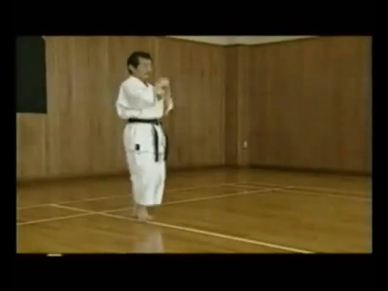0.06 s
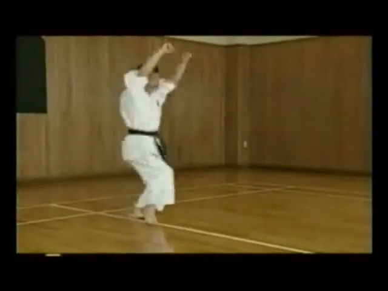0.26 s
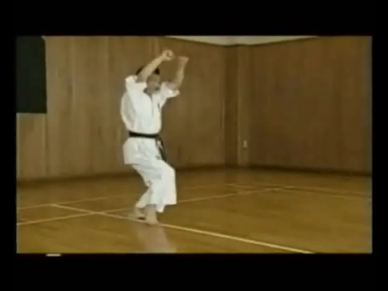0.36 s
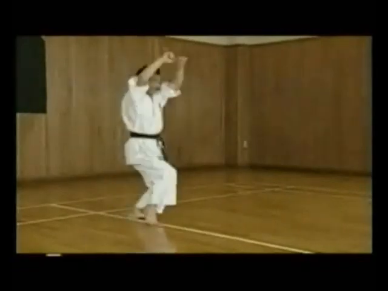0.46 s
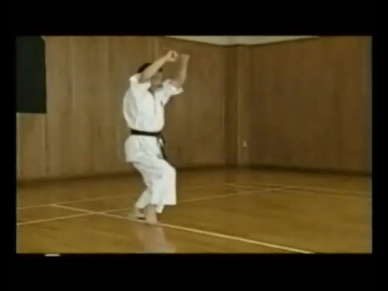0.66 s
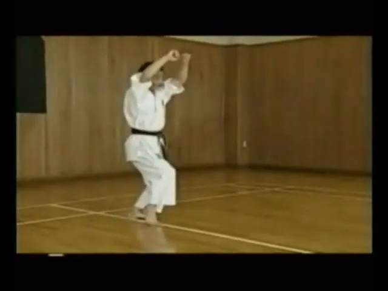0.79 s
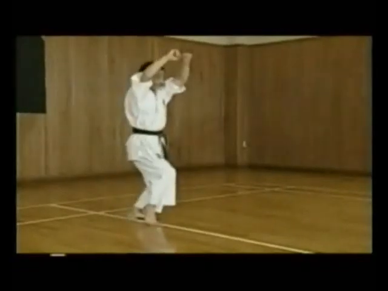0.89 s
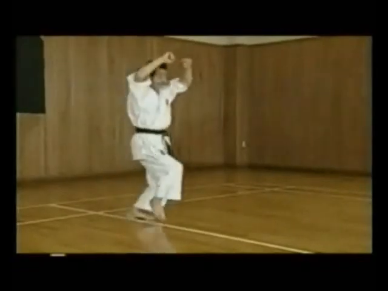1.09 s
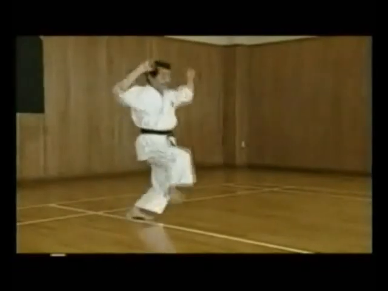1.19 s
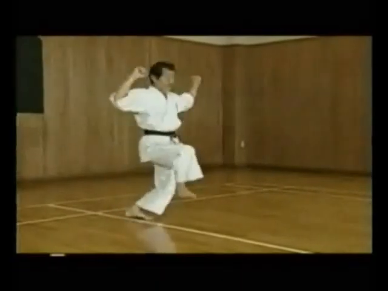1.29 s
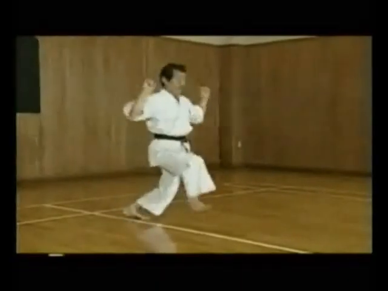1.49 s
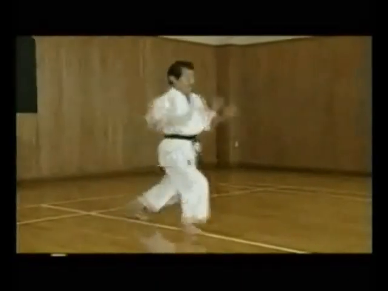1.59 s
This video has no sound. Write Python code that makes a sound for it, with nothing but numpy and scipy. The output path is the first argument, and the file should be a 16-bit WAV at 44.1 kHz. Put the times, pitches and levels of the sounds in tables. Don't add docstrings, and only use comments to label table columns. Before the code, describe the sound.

A karate uniform swishes briefly, then a low heel thump and crisp cloth snap hit together on a sprung wooden floor; a long hall echo fades into faint hiss, with soft rustling near the end.

```python
import sys
import numpy as np
from scipy import signal
from scipy.fft import rfft, irfft
from scipy.io import wavfile
from scipy.ndimage import uniform_filter1d

SR = 44100
rng = np.random.default_rng(int(sys.argv[2]) if len(sys.argv) > 2 else 0)


def field_ratio(decibels):
    return 10 ** (np.asarray(decibels, dtype=float) / 20)


def materialize(psi):
    bounded = np.clip(np.atleast_2d(psi).T, -1, 1)
    quanta = np.round(bounded * 32767).astype(np.int16)
    wavfile.write(sys.argv[1], SR, quanta)


N = 72765

# (frequency [Hz], density [dB])
HISS_SPECTRUM = [(25, 2.5), (60, 5), (130, 1.5), (220, -8.5), (330, -6), (600, -10), (2500, -11),
                 (10800, -14.5), (12000, -24)]
# (time [s], effort [dB], tautness [0-1])
ARM_THROW = [(.072, -59, 0.1), (.100, -48, 0), (.185, -52, 0.95), (.197, -50.5, 1), (.201, -46, 0.5),
             (.214, -41.5, 0.7), (.233, -35.5, 0), (.255, -37.5, 0.4), (.283, -36.5, 0.36),
             (.300, -37, 0.03), (.330, -42.5, 0.4)]
# (time [s], effort [dB], tautness [0-1])
JACKET_SNAP = [
    (.3085, -49.5, 0.2),
    (.3110, -27.5, 0.15),
    (.322, -31, 0.33),
    (.328, -29.5, 0.7),
    (.331, -28, 0.9),
    (.345, -28.5, 0.6),
    (.355, -31.5, 0.8),
    (.361, -34.5, 1),
    (.385, -37.5, 0.94),
    (.410, -54.5, 0.2),
]
# (time [s], effort [dB], tautness [0-1])
SOFT_STEP = [(1.10, -65, 0.3), (1.22, -60, 0.66), (1.30, -58, 0.61), (1.34, -54, 0.6), (1.37, -58, 0.45),
             (1.39, -65, 0.4), (1.45, -65, 0.96), (1.52, -71.5, 0.4), (1.60, -59.5, 0.25),
             (1.625, -57.5, 0.3), (1.66, -49, 0.3)]
# (frequency [Hz], density [dB])
LOOSE_CLOTH = [(71, -9), (120, -11), (503, -10.5), (584, -4), (654, -7.5), (1010, -14.5), (6520, -27),
               (10800, -36), (14100, -59), (22000, -120)]
# (frequency [Hz], density [dB])
FAST_SLEEVE = [(120, -41), (200, -27), (749, -6.5), (930, -20), (1160, -20), (1610, -27), (8440, -22.5),
               (10800, -36.5), (14100, -75), (22000, -120)]
# (frequency [Hz], density [dB])
JACKET_SLAP = [(120, -30), (200, -12), (323, -6), (1140, -3.5), (5850, -19.5), (7200, -22), (7670, -63),
               (8050, -44), (9000, -25), (11700, -49), (19800, -120)]
# (frequency [Hz], density [dB])
TAUT_CLOTH = [(120, -33), (200, -8.5), (1030, -7), (1190, -11.5), (1830, -12), (3200, -13), (6240, -14.5),
              (9000, -21.5), (11700, -40), (19800, -120)]
# (frequency [Hz], density [dB])
TROUSER_BRUSH = [(120, -34), (200, -16), (397, -11), (623, -12), (724, -9), (1460, -8), (10800, -8),
                 (14100, -31), (22000, -120)]
# (time [s], peak level [dB], pitch [Hz], length [s])
CLOTH_FLAPS = [(.079, -42, 340, 0.0013), (.110, -38, 360, 0.0017), (.1905, -41, 445, 0.0037),
               (.200, -42, 600, .0015), (.2322, -28.5, 676, 0.0014), (.2715, -24.5, 635, 0.0011),
               (.2835, -29.5, 680, 0.0019), (.3135, -26, 551, 0.0041), (.2335, -35, 1134, 0.0028),
               (.250, -38, 447.7, 0.018), (.322, -36.5, 1166, 0.0046), (1.331, -50, 800, 0.0011),
               (1.597, -52, 400, .0007), (1.3555, -43, 1020, 0.00058), (1.5895, -44.5, 456, 0.00057),
               (1.6155, -39.5, 560, 0.0024), (1.627, -54, 551, 0.0045)]
# (time [s], peak level [dB], pitch [Hz], length [s])
CREASE_CRACKS = [(.1995, -35, 3000, 0.00018), (0.217, -32, 2500, 0.00018), (.2305, -29, 2600, 0.00029),
                 (0.29, -32.5, 2510, 0.00027), (0.315, -29.5, 3000, 0.00027), (0.334, -28.5, 3600, .0002),
                 (0.351, -30, 2530, 0.00017), (0.364, -27, 3020, 0.00034), (0.514, -34, 590, 0.0035),
                 (0.762, -36.5, 735, 0.0013), (0.444, -34, 1333, 0.0037), (0.579, -36, 1460, 0.0018)]
# (time [s], peak level [dB], pitch
# [Hz], length [s])
HEEL_THUDS = [(.3042, -16.5, 92, 0.0067), (.2925, -31, 191, 0.0043), (.335, -33, 125, 0.0014),
              (.350, -29.5, 120, 0.011), (.366, -23.5, 85, 0.0065), (.385, -34.5, 137, 0.0087),
              (.4005, -30, 130, 0.0023), (0.409, -19, 100, 0.0061), (.436, -23.5, 85, 0.016),
              (.472, -25, 96, 0.0061), (.500, -28.5, 126, 0.011), (.512, -38, 62, 0.01),
              (0.536, -31, 112.6, 0.007), (.565, -27.5, 90, 0.0058), (.590, -40, 64.5, 0.0095),
              (.606, -32, 101, 0.0036), (.637, -33, 90, 0.0069), (.665, -37, 82, 0.0069),
              (0.687, -38.5, 100, 0.011), (.742, -41.5, 72, 0.0091), (.775, -44, 107, 0.0062),
              (.812, -38, 77, 0.004), (.888, -46.5, 69.5, 0.019), (.948, -46, 72.4, 0.0078)]
# (frequency [Hz], density [dB])
FLOOR_BOOM = [(12, -47), (20, -20), (38, -15.5), (67, -0.5), (81, -9.5), (138, -2.5), (182, -17.5),
              (260, -21.5), (340, -54), (570, -120)]
# (frequency [Hz], time to fall 60 dB [s])
HALL_DECAY = [(150, 1.07), (500, 1.656), (1000, 1.645), (1700, 1.554), (2500, 1.16), (5000, 0.9),
              (9000, 0.37)]
# (time [s], peak level [dB], pitch
# [Hz], length [s])
WALL_ECHOES = [(.320, -30, 1134, 0.0049), (.350, -31.5, 730, 0.0057), (.380, -36, 620, 0.002),
               (.465, -33, 750, 0.0062), (.476, -34.5, 542, 0.0058), (.538, -33.5, 545, 0.0043),
               (.560, -33.5, 780, 0.0046), (.590, -37, 554, 0.0093), (.642, -41, 540, 0.0088),
               (.682, -39.5, 524, 0.0053), (.700, -39.5, 700, 0.0038), (.415, -37.5, 1400, 0.0058),
               (.505, -39, 1430, 0.0091), (.660, -43, 1404, 0.0044), (.720, -49, 1280, .005),
               (.775, -43, 720, 0.0054), (.425, -37.5, 1520, 0.0033), (.460, -41.5, 1750, .004),
               (.545, -41, 1690, .004), (.620, -44, 1640, .004), (.270, -38.5, 167, .008),
               (.330, -33.5, 153, 0.0074), (.700, -48.5, 188, 0.0068), (.830, -50, 177, 0.0059),
               (1.020, -55, 75, 0.016), (1.335, -58, 62, .014)]
# (frequency [Hz], density [dB])
SIDE_GRIT = [(6000, -44), (8000, -19), (10000, -8), (11000, -12.5)]
# (frequency [Hz], threshold [dB])
DROPOUT_THRESHOLD = [(1500, -30), (3000, -13), (5000, -6), (7000, -2), (9000, 1), (11000, 1)]
# (time [s], added threshold [dB])
DROPOUT_DEPTH = [(0, 0), (.24, 0), (.30, 1.5), (.54, 2), (.57, 2.5), (.62, 1), (.67, 3), (.82, 2), (.86, 0),
                 (1.37, 0), (1.40, 6), (1.43, 0), (1.58, 0), (1.605, 5), (1.63, 0)]
# (start time [s], edge [Hz])
TREBLE_EDGE = [(0, 11500), (.093, 7500), (.105, 11500), (.185, 8000), (.197, 10800), (.255, 9700),
               (.278, 9000), (.298, 6300), (.312, 9100), (.345, 8500), (.372, 7500), (.396, 6300),
               (.408, 7600), (.442, 6500), (.455, 7500), (.488, 6500), (.543, 11500), (.563, 5000),
               (.572, 11500), (.72, 4900), (.775, 5700), (.785, 6700), (.812, 5700), (.825, 11500),
               (1.6, 7800), (1.613, 11500)]
# (start [s], end [s], low edge [Hz], high edge [Hz])
TREBLE_ISLANDS = [
    (.355, .405, 8950, 9250),
    (.435, .465, 10400, 10700),
    (.50, .545, 10550, 10800),
]


def evened(x):
    return x / np.sqrt(np.mean(x ** 2) + 1e-20)


def read(points, hz):
    f, value = np.transpose(points)
    return np.interp(np.log(hz + 1), np.log(f + 1), value, left=value[0] - 20)


def colour(x, points):
    response = field_ratio(read(points, np.fft.rfftfreq(len(x), 1 / SR)))
    return evened(irfft(rfft(x) * response, len(x)))


def wavelets(rows):
    t = np.arange(N) / SR
    total = np.zeros(N)
    for s, db, hz, wide in rows:
        bell = np.exp(-.5 * ((t - s) / wide) ** 2)
        total += field_ratio(db) * bell * np.cos(2 * np.pi * hz * (t - s))
    return total


def room_noise():
    t = np.arange(N) / SR
    duct_hz, duct_width_hz = 306, 29
    r = np.exp(-np.pi * duct_width_hz / SR)
    poles = [1, -2 * r * np.cos(2 * np.pi * duct_hz / SR), r * r]
    duct = field_ratio(-69) * evened(signal.lfilter([1], poles, rng.standard_normal(N)))
    hiss = field_ratio(-60.5) * colour(rng.standard_normal(N), HISS_SPECTRUM)
    hum = field_ratio(-67.5) * np.sin(2 * np.pi * 120 * t)
    return hiss + duct + hum


def cloth(move, loose, taut):
    creases_per_s, crease_spread_db, crease_share = 2500, 3, 0.46
    s, effort_db, tautness = np.transpose(move)
    t = np.arange(N) / SR
    fibres, sign_source = rng.standard_normal((2, N))
    sizes = field_ratio(crease_spread_db * np.minimum(rng.exponential(1, N), 3))
    creases = sizes * (rng.random(N) < creases_per_s / SR) * np.sign(sign_source)
    drive = (1 - crease_share) * fibres + crease_share * evened(creases)
    tension = np.clip(np.interp(t, s, tautness), 0, 1)
    level = field_ratio(np.interp(t, s, effort_db, left=-120, right=-120))
    return level * ((1 - tension) * colour(drive, loose) + tension * colour(drive, taut))


def cloth_snaps():
    return wavelets(CLOTH_FLAPS) + wavelets(CREASE_CRACKS)


def heel_on_floor():
    t = np.arange(N) / SR
    strike_s = HEEL_THUDS[0][0]
    since = np.maximum(t - strike_s, 0)
    flex_start_s, load_rise_s = .08, .02
    flex = field_ratio(-61) + field_ratio(-36) * np.exp(np.minimum(t - strike_s, 0) / load_rise_s)
    flex = flex * (since == 0) * (t > flex_start_s)
    boom_rise_s, boom_t60_s, boom_db = 0.026, 1.53, -35
    swell = (1 - np.exp(-since / boom_rise_s)) * field_ratio(boom_db - 60 * since / boom_t60_s)
    return wavelets(HEEL_THUDS) + colour(rng.standard_normal(N), FLOOR_BOOM) * (swell + flex)


def hall(x):
    first_echo_s, build_s, spacing = .008, 0.016, 20
    taps = np.zeros(N)
    at = np.arange(round(first_echo_s * SR), N - spacing, spacing)
    taps[at + rng.integers(0, spacing, len(at))] = rng.choice([-1., 1.], len(at))
    hz, t, z = signal.stft(taps, SR, nperseg=256)
    band_hz, band_t60 = np.transpose(HALL_DECAY)
    t60 = np.interp(np.log(hz + 1), np.log(band_hz), band_t60)
    envelope = (1 - np.exp(-t / build_s)) * field_ratio(-60 * t / t60[:, None])
    tail = signal.istft(z * envelope, SR, nperseg=256)[1]
    return signal.fftconvolve(x, tail / np.linalg.norm(tail))[:N]


def blended_hall(x):
    turn_hz = 21.93
    turn = np.pi * turn_hz * np.arange(N) / SR
    return sum(hall(x * np.sqrt(2 / 3) * np.cos(turn + k * np.pi / 3)) for k in range(3))


def wall_echoes():
    return wavelets(WALL_ECHOES)


def patchy(x):
    kept_share, band_bins = .3, 12
    hz, t, z = signal.stft(x, SR, window="cosine", nperseg=2048, noverlap=1024)
    on = rng.random((len(t), len(hz) // band_bins + 1)) < kept_share
    on = on.T.repeat(band_bins, axis=0)[:len(hz)]
    return signal.istft(z * on, SR, window="cosine", nperseg=2048, noverlap=1024)[1][:N]


def channel_difference(mid):
    copy = field_ratio(-29) * uniform_filter1d(np.roll(mid, 200), size=28)
    grit = field_ratio(-67.5) * colour(rng.standard_normal(N), SIDE_GRIT)
    return patchy(copy + grit)


def scene():
    uniform = cloth(ARM_THROW, LOOSE_CLOTH, FAST_SLEEVE)
    uniform = uniform + cloth(JACKET_SNAP, JACKET_SLAP, TAUT_CLOTH)
    uniform = uniform + cloth(SOFT_STEP, LOOSE_CLOTH, TROUSER_BRUSH)
    snaps = cloth_snaps()
    direct = uniform + snaps + heel_on_floor()
    reflected = field_ratio(-2.5) * blended_hall(uniform) + field_ratio(-6) * hall(snaps) + wall_echoes()
    mid = direct + reflected + room_noise()
    side = channel_difference(mid)
    return np.array([mid + side, mid - side])


def treble_dropouts(x):
    band_spread_db, frame_spread_db, band_bins = 5.5, 2.5, 16
    hz, t, z = signal.stft(x, SR, window="cosine", nperseg=2048, noverlap=1024)
    power = abs(z.mean(0)) ** 2
    band = uniform_filter1d(uniform_filter1d(power, size=24, axis=0), size=3, axis=1)
    blocks = rng.standard_normal((len(t), len(hz) // band_bins + 1))
    blocks = blocks.T.repeat(band_bins, axis=0)[:len(hz)]
    frame_db = frame_spread_db * rng.standard_normal(len(t)) + np.interp(t, *np.transpose(DROPOUT_DEPTH))
    threshold_db = read(DROPOUT_THRESHOLD, hz)[:, None] + band_spread_db * blocks + frame_db
    kept = z * (power > band * field_ratio(2 * threshold_db))
    return signal.istft(kept, SR, window="cosine", nperseg=2048, noverlap=1024)[1][:, :N]


def treble_ceiling(x):
    rim_hz, leak_db = 10880, -26
    hz, t, z = signal.stft(x, SR, nperseg=512, noverlap=384)
    s, edge = np.transpose(TREBLE_EDGE)
    edge_now = edge[np.searchsorted(s, t, "right") - 1]
    keep = (hz[:, None] < edge_now) | (hz[:, None] > rim_hz)
    for start, end, low_hz, high_hz in TREBLE_ISLANDS:
        in_band = ((hz > low_hz) & (hz < high_hz))[:, None]
        keep = keep | in_band & (t > start) & (t < end)
    return signal.istft(z * np.maximum(keep, field_ratio(leak_db)), SR, nperseg=512, noverlap=384)[1][:, :N]


def low_pass(x):
    return signal.sosfilt(signal.butter(12, 11070, fs=SR, output="sos"), x)


def record(dry):
    low_cut_hz, high_cut_hz = 23, 11060
    rise = (np.fft.rfftfreq(N, 1 / SR) / low_cut_hz) ** 4
    bass_cut = irfft(rfft(dry) * rise / (1 + rise), N)
    lowpass = signal.firwin(1023, high_cut_hz, window=("kaiser", 10), fs=SR)
    limited = signal.oaconvolve(bass_cut, lowpass[None], "same")
    mix = treble_ceiling(treble_dropouts(limited))
    return low_pass(mix)


dry = scene()
out = record(dry)
materialize(out)
```